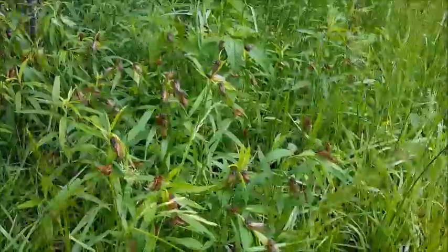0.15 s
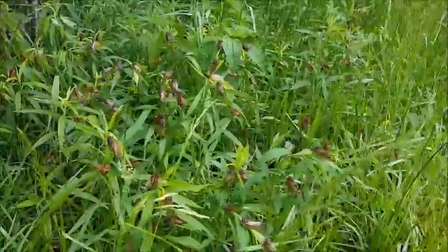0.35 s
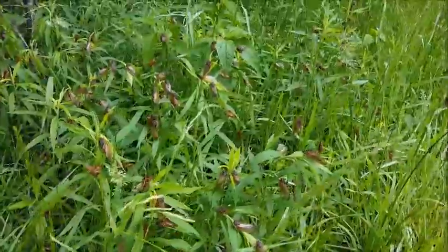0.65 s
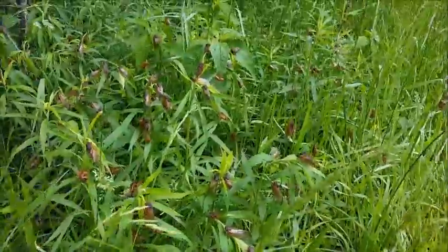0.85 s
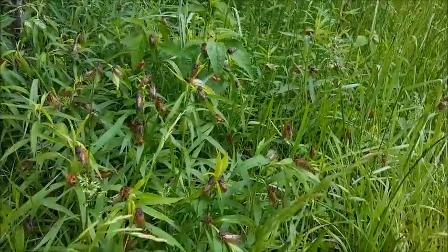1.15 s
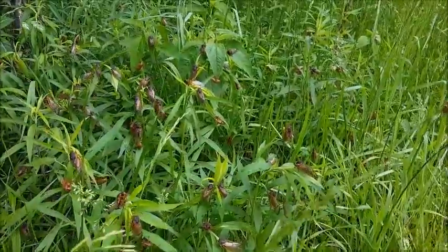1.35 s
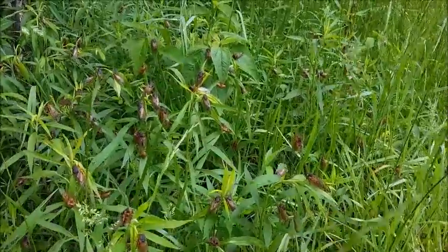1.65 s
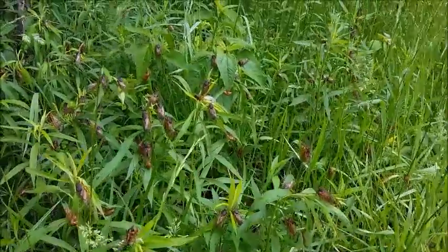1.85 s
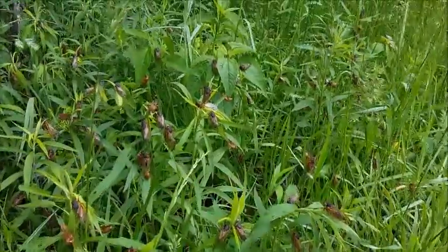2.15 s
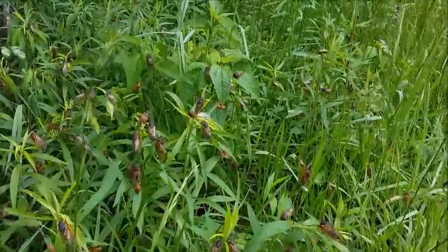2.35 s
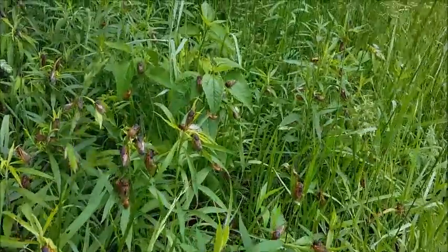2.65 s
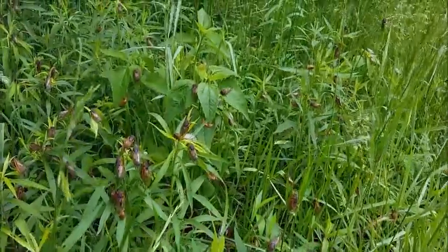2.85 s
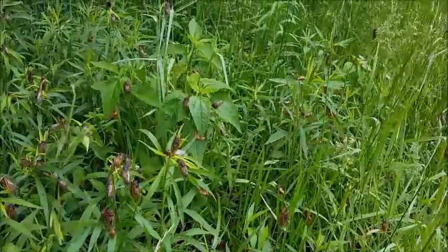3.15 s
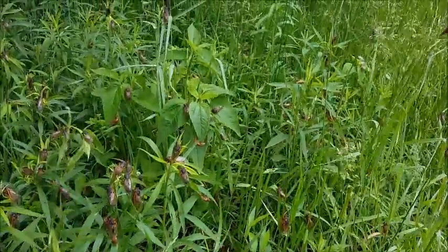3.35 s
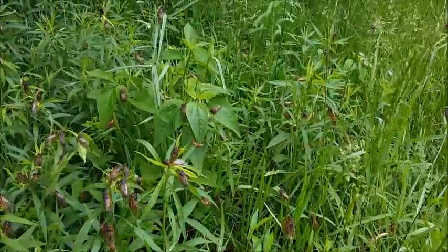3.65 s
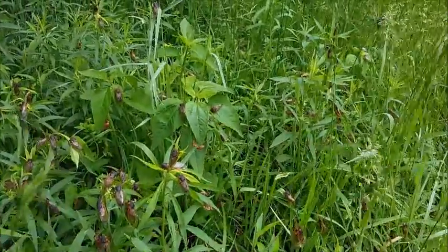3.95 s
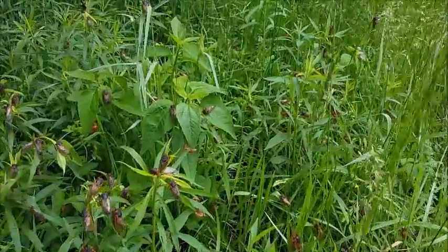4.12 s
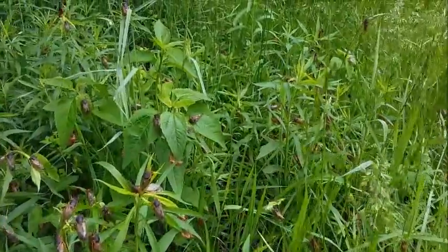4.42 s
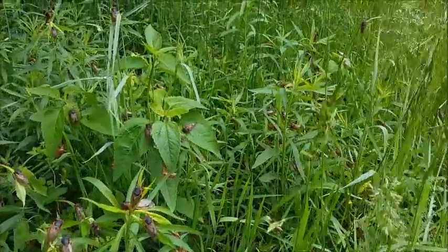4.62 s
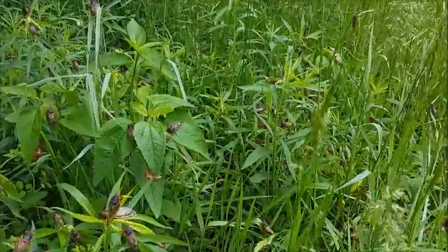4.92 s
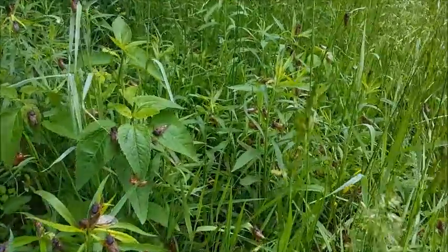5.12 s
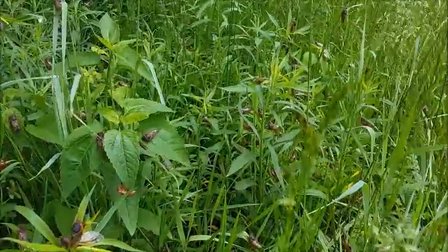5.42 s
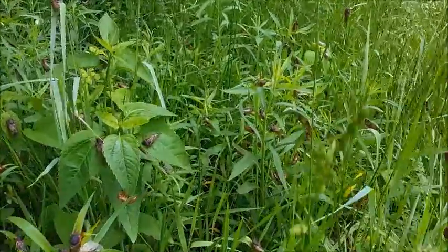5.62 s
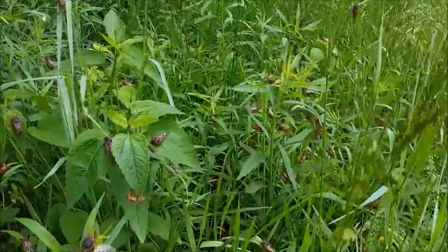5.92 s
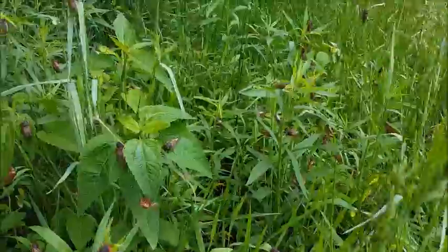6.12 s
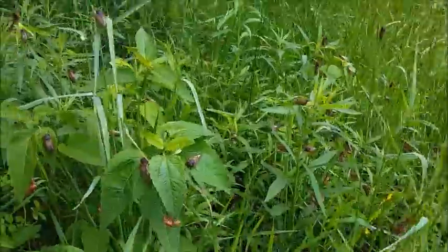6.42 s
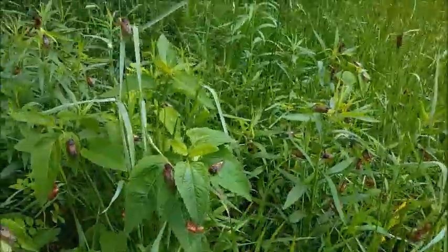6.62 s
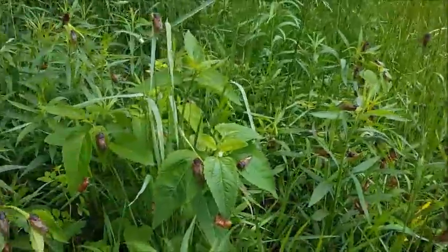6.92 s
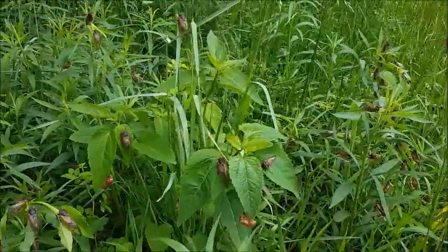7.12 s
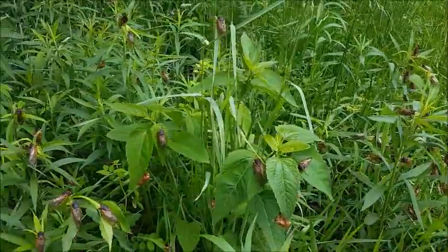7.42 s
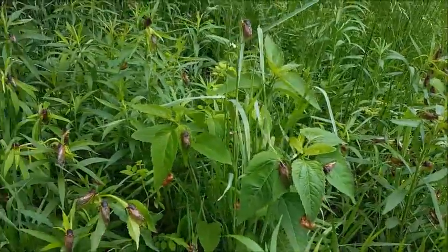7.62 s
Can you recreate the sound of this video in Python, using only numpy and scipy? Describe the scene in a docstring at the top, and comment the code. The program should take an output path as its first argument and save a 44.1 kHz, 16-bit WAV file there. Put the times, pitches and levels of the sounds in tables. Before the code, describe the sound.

Two close crickets chirp over a distant cicada drone, with scattered bird whistles, two nasal mews and light leaf rustles.

```python
"""A summer field. From the start, distant periodical cicadas merge into one hollow drone and two close
field crickets chirp by scraping their wings, with more farther off, over soft hiss and low rumble.
After 1 s birds whistle and trill, and one mews just after 2 s. Leaves then rustle and stems snap near
the hand-held microphone, and a far twitter swells. Around 5 s leaves screen the nearest cricket;
it returns as a second mew sounds near 6 s, and a last rustle follows at 7 s."""
import sys
import numpy as np
from scipy import signal
from scipy.fft import rfft, irfft
from scipy.io import wavfile
from scipy.ndimage import uniform_filter1d, map_coordinates

SR = 44100
rng = np.random.default_rng(int(sys.argv[2]) if len(sys.argv) > 2 else 0)


def pcm_store(signal):
    """Save signal as 16-bit PCM."""
    levels = np.round(np.clip(np.atleast_2d(signal), -1, 1) * 32767)
    wavfile.write(sys.argv[1], SR, levels.astype(np.int16).T)


N = 342657


def cicadas(chorus_db=4.0, pan_db=-2.0):
    """Incoherent summation: thousands of far singers near one pitch merge into a narrow band of noise."""
    # chorus spectrum: f/Hz, relative spectral level/dB
    spectrum = [(680, -40), (760, -29), (830, -19), (950, -21.5), (1050, -16), (1150, -7.5), (1230, -4),
                (1305, 1.5), (1360, -3), (1420, -10.5), (1520, -17), (1700, -27.5), (2000, -33.5),
                (2800, -85)]
    # its slow swell: t/s, level/dB
    swell = [(0, -42), (2.5, -45.5), (3.6, -43.3), (5.2, -43.3), (6.3, -42.3), (7.77, -43.3)]
    # single cicadas sagging as a phrase ends: t/s, length/s, start f/Hz, end f/Hz, level/dB, roughness
    slurs = [(1.25, 0.41, 960, 849, -60.5, 0.24), (5.58, .32, 880, 799, -60.5, 0.22),
             (6.15, 0.306, 865, 808, -62.5, 0.25)]
    chorus = gain_of(chorus_db) * envelope(swell) * diffuse_noise(spectrum, patchy_db=1.17)
    soloists = glides(slurs, arch_per_s=-.05, flutter=.062, flutter_hz=91.3, direct_db=-2, echo_db=-6.5)
    return panned(pan_db) * (chorus + soloists)


def near_crickets(near_db=4.5, slow_db=3.5, near_lead_s=.0105, slow_lead_s=.0155, clear_db=-40):
    """Acoustic shadowing: leaves weaken two crickets' direct sound, but the echo keeps its strength."""
    # the nearest chirps about four times a second, in bouts with short pauses: t/s
    near_times = [-0.072, 0.163, 0.406, 0.674, 0.935, 1.193, 1.436, 1.674, 1.942, 2.196, 2.437, 2.705,
                  2.987, 3.411, 3.646, 4.025, 4.35, 4.602, 4.843, 5.081, 5.318, 5.584, 5.982, 6.21, 6.439,
                  6.713, 7.077, 7.32, 7.561]
    # its direct sound fades while leaves are in the way: t/s, level/dB
    near_level = [(0, -40.5), (2.2, -39.3), (3.7, -40.3), (4.35, -42.5), (4.9, -46), (5.5, -46.3),
                  (6.7, -40), (7.77, -39.3)]
    # its lower neighbour chirps about three times a second: t/s
    slow_times = [-0.022, 0.308, 0.731, 1.083, 1.447, 2.072, 2.492, 2.834, 3.189, 3.605, 3.91, 4.341, 4.712,
                  5.164, 5.508, 5.866, 6.173, 6.636, 6.941, 7.553]
    # the neighbour's direct sound: t/s, level/dB
    slow_level = [(0, -48.3), (2.3, -48.3), (3.3, -45.3), (5.8, -45), (7.77, -49.5)]
    out, echo_feed = np.zeros((2, N)), np.zeros(N)
    for s in near_times:
        db = np.interp(s, *np.transpose(near_level))
        song = chirp(4, period_s=.034, stroke_s=.023, pitch=1.0058, rise=.0042,
                     first_db=-9, first_pitch=.96)
        scatter = .52 * gain_of(clear_db - db)  # the deeper the shadow, the larger the scattered share
        heard = through_grass(song, scatter, spread_s=.024)
        add(out, s - near_lead_s, gain_of(db + near_db) * panned(-4.2) * heard)
        add(echo_feed, s - near_lead_s, gain_of(-43) * song)
    for s in slow_times:
        db = np.interp(s, *np.transpose(slow_level))
        song = chirp(3, period_s=.039, stroke_s=.026, pitch=1, rise=.0045)
        heard = through_grass(song, scatter=.62)
        add(out, s - slow_lead_s, gain_of(db + slow_db) * panned(-7) * heard)
        add(echo_feed, s - slow_lead_s, gain_of(-53) * song)
    return out + panned(-6) * field_echo(echo_feed)


def chirp(strokes, period_s, stroke_s, pitch, rise, first_db=0, first_pitch=1):
    """A pulse train of wing strokes: the first is short, and the others climb slightly in pitch."""
    out = np.zeros(int((strokes + 1) * period_s * SR))
    add(out, stroke_s * .36, gain_of(first_db) * wing_stroke(stroke_s * .77, pitch * first_pitch))
    for k in range(1, strokes):
        add(out, k * period_s, wing_stroke(stroke_s, pitch * (1 + rise * (k - 2))))
    return out


def wing_stroke(length_s, pitch, jitter=.0048, second_db=-32.5, third_db=-39):
    """Stridulation: a scraper runs along a file; tooth rate and tone fall as the closing wings slow."""
    # one closing of the wings: fraction of the stroke, f/Hz at pitch = 1, level/dB
    stroke = [(0, 5267, -20.5), (.2, 5136, -9), (.42, 5084, -2.5), (.62, 4949, -4), (.8, 4758, -9.5),
              (1, 4370, -18.5)]
    share, tooth_hz, db = np.transpose(stroke)
    u = np.linspace(0, 1, int(length_s * SR))
    hz = np.interp(u, share, tooth_hz) * pitch * (1 + jitter * wander(len(u), hz=860))
    phase = 2 * np.pi * (np.cumsum(hz) / SR + rng.random())
    tone = (np.sin(phase) + gain_of(third_db) * np.sin(3 * phase)) * gain_of(np.interp(u, share, db))
    # the octave grows as the tone leaves the wing's resonance
    octave = gain_of(second_db) * np.sin(np.pi * u ** 2) * np.sin(2 * phase)
    return (tone + octave) * signal.windows.tukey(len(u), .15)


def far_crickets(pitch, db, pan_db, count=3):
    """Reverberation blurs distant crickets, each chirping at its own pace and pitch."""
    out = np.zeros(N)
    for detune, pace_s in rng.uniform([.985, .27], [1.015, .42], (count, 2)):
        for s in np.arange(-rng.random() * pace_s, N / SR, pace_s):
            song = chirp(4, period_s=.037, stroke_s=.022, pitch=pitch * detune, rise=.0032,
                         first_db=-7, first_pitch=.98)
            add(out, s + .03 * rng.standard_normal(), song)
    heard = field_echo(out) + 1.16 * through_grass(out, scatter=.36)[:, :N]
    return gain_of(db) * panned(pan_db) * unit_rms(heard)


def whistling_birds(pan_db=-7.5):
    """Nearly pure tones, which fast modulation roughens into trills."""
    # the clearest notes: t/s, length/s, start f/Hz, end f/Hz, level/dB, roughness (0-1)
    notes = [ (1.10, .09, 2920, 2460, -61.5, .2), (1.20, .06, 7200, 7250, -70, .6),
             (1.34, .10, 7100, 7750, -67.5, .97), (1.80, .3, 7200, 7100, -65.5, .15),
             (1.96, .15, 7950, 7800, -68.5, .5), (2.09, .065, 2420, 2260, -63.5, .1),
             (2.11, .19, 6650, 6100, -69, .8), (3.32, .1, 2380, 2310, -63, .3),
             (3.92, .07, 3100, 2900, -61, .44), (4.65, .04, 2760, 3180, -58.5, .2),
             (5.11, .085, 4400, 4130, -63, .3), (5.17, .045, 3130, 2760, -61.5, .1),
             (6.403, .018, 5950, 8400, -52.5, .4), (6.60, .13, 3900, 3900, -64, .35),
             (7.05, .026, 2600, 2360, -61, .1), (7.603, .035, 3200, 3950, -59, .4),
             (7.635, .04, 3850, 3450, -57.5, .6)]
    song = glides(notes, arch_per_s=.18, flutter=.06, flutter_hz=705, direct_db=-2.5, echo_db=-1)
    return panned(pan_db) * song


def mewing_bird(jitter=.005, jitter_hz=500, rasp=.35, direct_db=-2.5, echo_db=-3, harmonics=13):
    """Source and filter: a gliding harmonic series, of which the throat favours the high members."""
    # nasal mews: t/s, length/s, top f/Hz, level/dB
    mews = [(2.19, .44, 778, -66), (5.89, .47, 816, -61.5)]
    # a quick rise and slow fall: fraction of the mew, fraction of the top pitch, level/dB
    contour = [(0, .89, -11), (.15, .975, -1), (.26, 1, 0), (.45, .946, -.5), (.66, .905, -3),
               (1, .858, -10)]
    # throat response: f/Hz, gain/dB
    throat = [(2000, -30), (3200, -11), (3900, -7), (5000, -11), (6200, 0), (7200, -3.5), (7700, -9),
              (8400, -6.5), (10000, -22)]
    share, bend, contour_db = np.transpose(contour)
    out = np.zeros(N)
    for s, length_s, top_hz, db in mews:
        u = np.linspace(0, 1, int(length_s * SR))
        hz = top_hz * np.interp(u, share, bend) * (1 + jitter * wander(len(u), jitter_hz))
        phase = 2 * np.pi * np.cumsum(hz) / SR
        voice = sum(gain_of(at_hz(throat, k * hz)) * np.sin(k * phase) for k in range(1, harmonics + 1))
        voice = unit_rms(voice * (1 + rasp * wander(len(u), jitter_hz)))
        voice *= signal.windows.tukey(len(u), .1)
        add(out, s, gain_of(db + np.interp(u, share, contour_db)) * voice)
    direct = through_grass(out, scatter=.35)[:, :N]
    return panned(-7.5) * (gain_of(direct_db) * direct + gain_of(echo_db) * field_echo(out))


def leaves(spread_db=4.3, clicks_per_s=3000, rustle_db=2.5, fizz_db=-4):
    """Shot noise: brushed leaves give off a spray of tiny clicks of random strength."""
    # rustles: t/s, length/s, level/dB, centre f/Hz of the dull body, crisp top re body/dB
    rustles = [(2.531, 0.37, -65, 3800, 3), (2.69, .09, -58.5, 3700, -2.5), (2.796, .065, -57.5, 3640, -4),
               (3.297, 0.22, -67, 2700, -13), (3.47, 0.22, -57, 2620, -10), (3.98, .3, -60.5, 2860, -9),
               (6.93, .11, -66, 3500, 8)]
    out = np.zeros((2, N))
    for s, length_s, db, body_hz, crisp_db in rustles:
        shape = (2, int(length_s * SR))
        clicks = rng.standard_normal(shape) * (rng.random(shape) < clicks_per_s / SR)
        clicks *= gain_of(spread_db * np.minimum(rng.exponential(1, shape), 4))
        body = unit_rms(band(clicks, hz=body_hz, octaves=.39))
        top = unit_rms(band(clicks, hz=7400, octaves=.4))
        fizz = gain_of(fizz_db) * unit_rms(band(clicks, hz=13300, octaves=.18))
        rustle = unit_rms(body + gain_of(crisp_db) * unit_rms(top + fizz))
        add(out, s, gain_of(db + rustle_db) * rustle * signal.windows.tukey(shape[1], .6))
    return out


def stems(decay_s=.003, snap_db=3.8):
    """Damped transients: each snapping stem gives a band of noise that decays exponentially."""
    # snaps: t/s, level/dB, centre f/Hz
    snaps = [(1.742, -59, 6500), (2.538, -62, 12000), (2.703, -56, 9000), (2.739, -51, 7500),
             (3.327, -52, 2700), (3.621, -46, 2000), (4.505, -58.5, 8500), (4.590, -56, 7500),
             (5.004, -52, 3000), (6.978, -51.5, 8300)]
    out = np.zeros((2, N))
    t = np.arange(SR // 20) / SR
    for s, db, hz in snaps:
        crack = unit_rms(band(rng.standard_normal((2, len(t))), hz, octaves=.27))
        add(out, s, gain_of(db + snap_db) * crack * np.exp(-t / decay_s))
    return out


def far_birds(notes_per_s=25, low_hz=2200, high_hz=2800):
    """Echo outweighs direct sound, smearing many short notes from the trees into a soft twitter."""
    # swell of the twitter: t/s, level/dB
    swell = [(0, -72), (3.1, -76), (3.5, -62.5), (4.3, -70), (4.7, -63), (6.1, -63.5), (6.7, -73.5)]
    notes = []
    for when, height, bend in rng.random((int(notes_per_s * N / SR), 3)):
        hz = low_hz + height * (high_hz - low_hz)
        notes.append((when * N / SR, .06, hz * (.9 + .1973 * bend), hz * .926, 0, 1))
    twitter = glides(notes, arch_per_s=.6, flutter=.0422, flutter_hz=299, direct_db=-14, echo_db=1)
    return envelope(swell) * unit_rms(twitter)


def far_hiss(db=7):
    """Broadband ambient noise: far leaves and insects sum to a soft hiss."""
    # hiss spectrum: f/Hz, relative spectral level/dB
    spectrum = [(200, -13.5), (450, 0.5), (700, 1.5), (1800, 1.5), (2400, 3), (3200, -5), (4200, -5),
                (5800, -6.5), (6400, -11), (8300, -9.5), (10500, -18.3), (13000, -16.5), (15500, -15)]
    # its slow swell: t/s, level/dB
    swell = [(0, -66.8), (3.7, -64), (7.77, -66.3)]
    # its stereo balance: f/Hz, left minus right level/dB
    balance = [(500, -0.5), (2000, -3.5), (4000, -0.5), (7500, -5), (10500, -5.5), (13000, 1.5)]
    return gain_of(db) * envelope(swell) * diffuse_noise(spectrum, patchy_db=2.03, balance=balance)


def rumble(rumble_db=.5, puff_pan_db=5):
    """Slow pressure fluctuations: outdoor rumble, with soft gusts and bumps on the microphone."""
    # rumble spectrum: f/Hz, relative spectral level/dB
    spectrum = [(15, -19), (30, -12), (50, -5.5), (70, -2), (84, 0), (100, -2), (160, -6.5), (240, -9),
                (330, -16.5), (500, -28.5), (1000, -53), (3000, -90)]
    # its slow swell: t/s, level/dB
    swell = [(0, -61), (1.6, -58.5), (2.8, -62), (5, -60.5), (7.77, -60.5)]
    # gusts and bumps: t/s, length/s, level/dB, centre f/Hz
    puffs = [(1.536, 0.19, -56, 57.7), (2.242, 0.18, -57.5, 74.6), (3.605, 0.04, -60, 480),
             (3.7, 0.67, -68, 210), (4.481, .44, -61, 58.3)]
    out = gain_of(rumble_db) * envelope(swell) * diffuse_noise(spectrum, patchy_db=1)
    for s, length_s, db, hz in puffs:
        size = int(length_s * SR)
        puff = unit_rms(band(rng.standard_normal((2, size)), hz, octaves=.37) * np.hanning(size))
        add(out, s, gain_of(db) * panned(puff_pan_db) * puff)
    return out


def glides(notes, arch_per_s, flutter, flutter_hz, direct_db, echo_db):
    """Random frequency and amplitude modulation of gliding tones, heard directly and as an echo."""
    out = np.zeros(N)
    for s, length_s, start_hz, end_hz, db, rough in notes:
        u = np.linspace(0, 1, int(length_s * SR))
        arch = 1 + arch_per_s * length_s * np.sin(np.pi * u)  # longer notes bend more
        hz = (start_hz + (end_hz - start_hz) * u) * arch
        hz *= 1 + flutter * rough * wander(len(u), flutter_hz)
        strength = signal.windows.tukey(len(u), .5) * (1 + np.sqrt(rough) * wander(len(u), flutter_hz))
        add(out, s, gain_of(db) * unit_rms(strength * np.sin(2 * np.pi * np.cumsum(hz) / SR)))
    direct = through_grass(out, scatter=.35)[:, :N]
    return gain_of(direct_db) * direct + gain_of(echo_db) * field_echo(out)


def through_grass(x, scatter, spread_s=.02, reflections=14):
    """Scattering: direct sound reaches the right ear first; each ear gets its own leaf reflections."""
    size = int(spread_s * SR)
    out = np.zeros((2, len(x) + size))
    for ear, lag_samples in zip(out, (2, 0)):
        when, paths = rng.random(reflections), np.zeros(size + 1)
        paths[(when * size).astype(int)] = rng.standard_normal(reflections) * np.exp(-when)
        bounced = signal.fftconvolve(x, paths)
        ear += scatter * bounced * np.linalg.norm(x) / np.linalg.norm(bounced)
        add(ear, lag_samples / SR, x)
    return out * np.linalg.norm(x) / np.linalg.norm(out, axis=1, keepdims=True)


def field_echo(x, tails=3):
    """Diffuse reverberation from grass and trees; its paths keep changing as the microphone moves."""
    # reverberation time: f/Hz, T60/s
    t60 = [(1000, 0.91), (3000, 0.36), (5000, .36), (9000, 0.57)]
    out = np.zeros((2, N))
    for k in range(tails):
        hz, t, noise = signal.stft(rng.standard_normal((2, SR // 2)), SR, nperseg=256)
        decay = gain_of(-60 * t / at_hz(t60, hz)[:, None])
        tail = signal.istft(noise * decay, SR, nperseg=256)[1]
        tail /= np.linalg.norm(tail[0])
        crossfade = np.sqrt(2 / tails) * np.cos(np.pi * (np.arange(N) / SR + k / tails))
        out += signal.oaconvolve(np.atleast_2d(x * crossfade), tail, axes=1)[:, :N]
    return out


def diffuse_noise(spectrum, patchy_db, balance=((0, 0), (1, 0))):
    """Partial coherence: shaped noise with drifting patches, most alike at both ears in the bass."""
    # likeness of left and right: f/Hz, correlation coefficient
    coherence = [(60, 0.88), (92, 0.82), (140, 0.85), (210, 0.75), (330, 0.62), (500, 0.47), (770, 0.55),
                 (1170, -0.26), (1790, -0.032), (2740, 0.31), (4190, -0.038), (6410, 0.092), (9810, 0.18),
                 (15000, 0.01)]
    frames, hz = N // 512 + 5, np.fft.rfftfreq(2048, 1 / SR)
    a, b, c, d, patches = rng.standard_normal((5, frames, len(hz)))
    patches = uniform_filter1d(patches, size=14, axis=0)  # smooth in time
    patches = unit_rms(uniform_filter1d(patches, size=3, axis=1))  # and in frequency
    alike = np.clip(at_hz(coherence, hz), -1, 1)
    left = a + 1j * b
    right = alike * left + np.sqrt(1 - alike ** 2) * (c + 1j * d)
    lean = gain_of(at_hz(balance, hz) / 2)
    bins = np.array([left * lean, right / lean]) * gain_of(at_hz(spectrum, hz) + patchy_db * patches)
    return unit_rms(signal.istft(bins.transpose(0, 2, 1), nperseg=2048, noverlap=1536)[1][:, :N])


def gain_of(db):
    """Decibels to an amplitude ratio."""
    return 10 ** (np.asarray(db) / 20)


def unit_rms(x):
    """Normalises to rms 1."""
    return x / np.sqrt(np.mean(x ** 2) + 1e-20)


def at_hz(points, hz):
    """Interpolates a table on a log-frequency axis."""
    f, value = np.transpose(points)
    return np.interp(np.log(hz + 1), np.log(f + 1), value)


def envelope(curve):
    """Interpolates a level curve to a gain per sample."""
    return gain_of(np.interp(np.arange(N) / SR, *np.transpose(curve)))


def panned(db):
    """Gains for an interaural level difference, left minus right."""
    return gain_of(np.array([[db / 2], [-db / 2]]))


def add(mix, s, sound):
    """Superposes a sound on a mix at time s."""
    start = int(round(s * SR))
    sound = sound[..., max(-start, 0):]
    part = mix[..., max(start, 0):][..., :sound.shape[-1]]
    part += sound[..., :part.shape[-1]]


def wander(size, hz):
    """Smooth random modulation of rms near 1 that moves about hz times a second."""
    at = np.arange(size) * hz / SR
    return map_coordinates(rng.standard_normal(int(at[-1]) + 3), [at], order=2, mode="nearest")


def band(x, hz, octaves):
    """A band-pass filter, Gaussian in log frequency."""
    f = np.fft.rfftfreq(x.shape[-1], 1 / SR)
    return irfft(rfft(x) * np.exp(-.5 * (np.log2((f + 1) / hz) / octaves) ** 2), x.shape[-1])


def scene():
    """Superposition of all the sources in the field."""
    birds = whistling_birds()
    insects = far_crickets(pitch=1.02, db=-65, pan_db=-5.5)
    insects += far_crickets(pitch=1.135, db=-74, pan_db=-7.5)
    insects += cicadas() + near_crickets()
    birds += mewing_bird() + far_birds()
    plants = panned(-2) * (leaves() + stems())
    return insects + birds + plants + far_hiss() + rumble()


def record(dry):
    """Band limiting: the recorder's steep low-pass filter."""
    cutoff_hz = 15740
    low_pass = signal.firwin(801, cutoff_hz, window=("kaiser", 9), fs=SR)
    return signal.oaconvolve(dry, low_pass[None], "same")


dry = scene()
out = record(dry)
pcm_store(out)
```